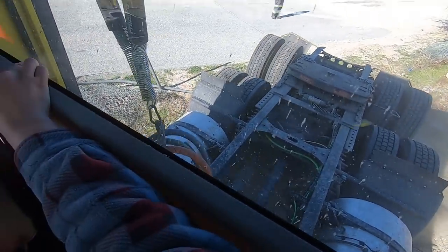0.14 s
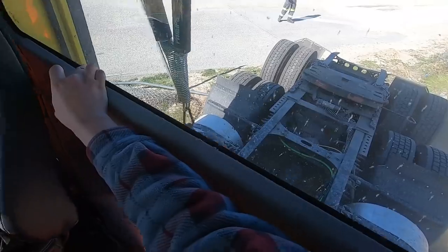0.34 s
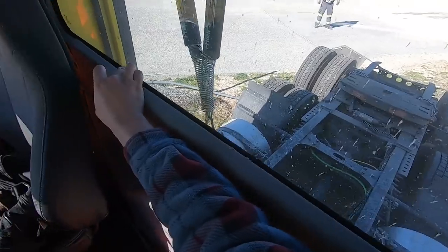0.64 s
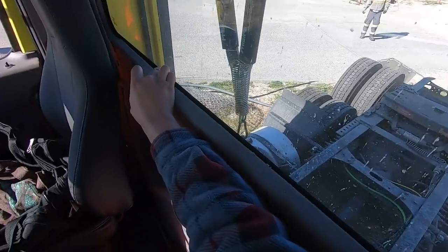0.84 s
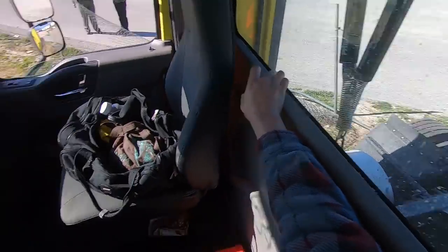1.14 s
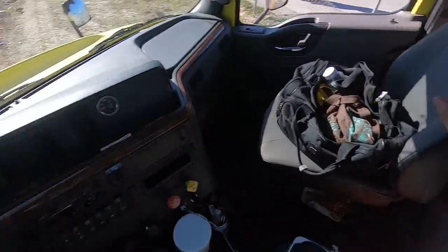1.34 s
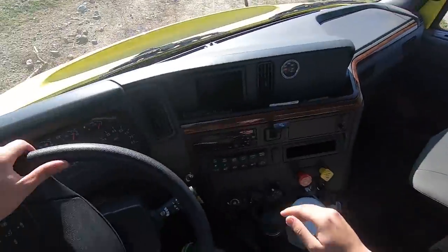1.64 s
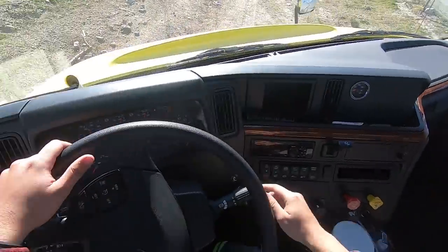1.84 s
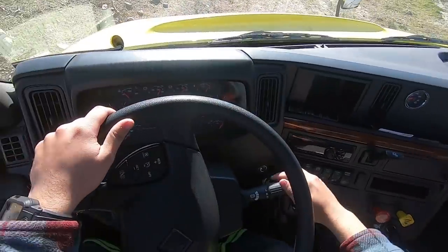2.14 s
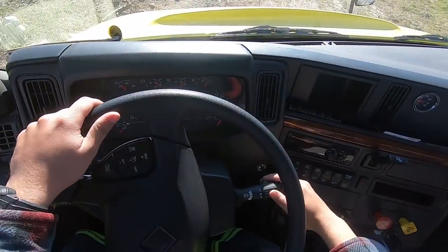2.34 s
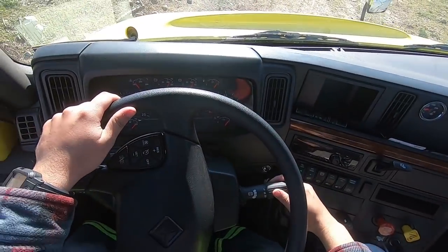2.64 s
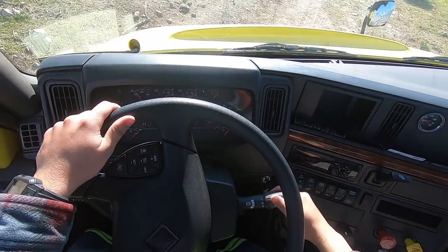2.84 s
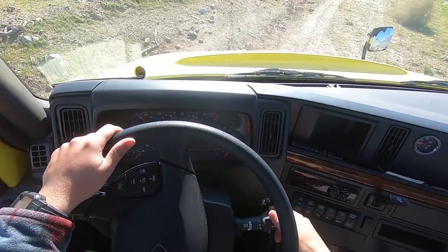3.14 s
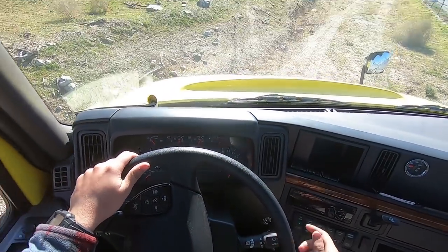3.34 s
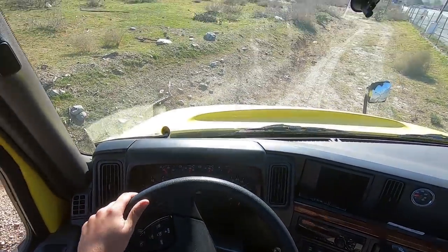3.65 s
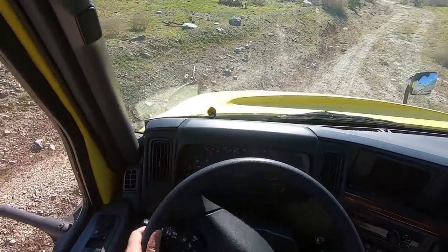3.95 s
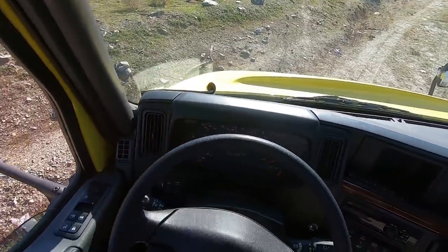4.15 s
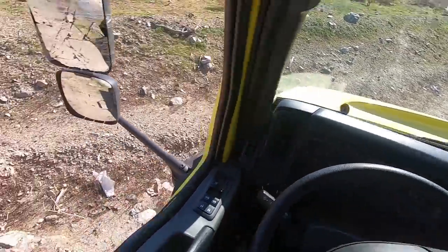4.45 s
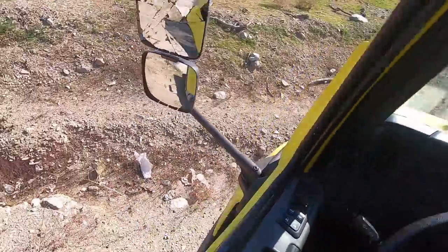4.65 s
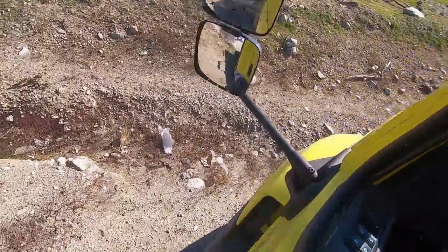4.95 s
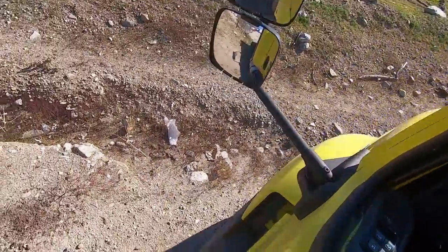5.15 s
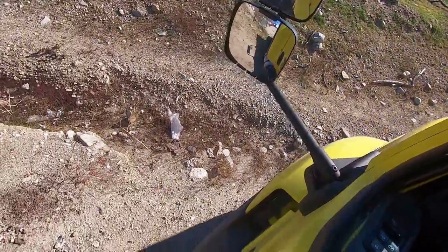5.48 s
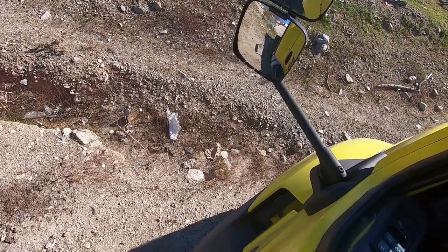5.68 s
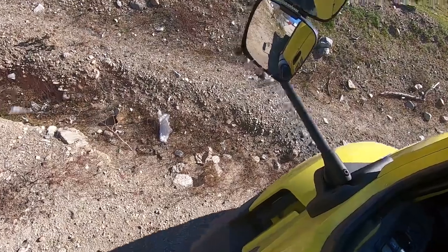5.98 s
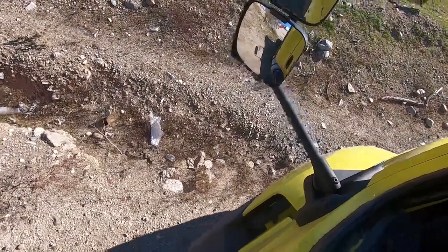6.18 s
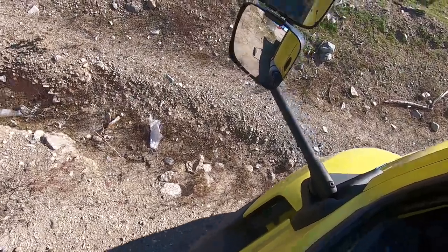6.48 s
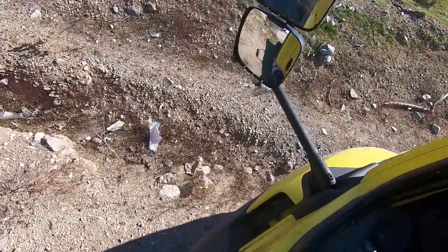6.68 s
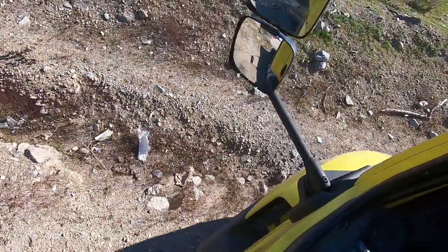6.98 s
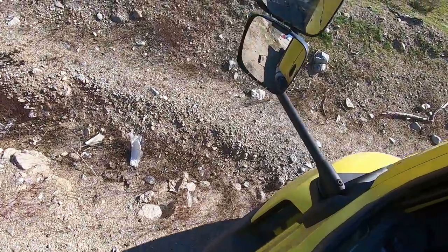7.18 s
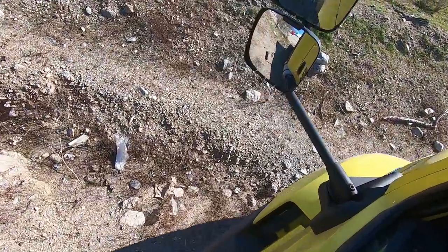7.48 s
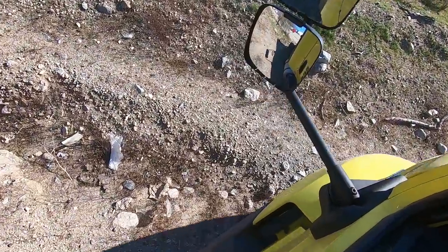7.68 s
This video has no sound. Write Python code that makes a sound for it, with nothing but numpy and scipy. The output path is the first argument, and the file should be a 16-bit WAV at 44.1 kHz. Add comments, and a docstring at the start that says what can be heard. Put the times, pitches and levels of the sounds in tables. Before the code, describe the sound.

A diesel truck engine booms and slows to idle inside the cab, then clatters through an open window as air brakes hiss.

```python
"""A six-cylinder diesel truck booms and clatters as it drops from a fast idle to a slow one, heard close,
from the driver's seat. The cab's air resonates near the firing rate, panels thump, a lever clicks and
air valves hiss. From 4.7 s the microphone hears the engine through the open side window: a hollow roar
rises under the bonnet, the brakes vent, the brake valve's rubber diaphragm honks in the escaping air
and wind buffets the microphone."""
import sys
import numpy as np
from scipy import signal
from scipy.fft import rfft, irfft
from scipy.io import wavfile
from scipy.ndimage import uniform_filter1d, map_coordinates

SR = 44100
rng = np.random.default_rng(int(sys.argv[2]) if len(sys.argv) > 2 else 0)


def master_out(mix):
    """Clip the mix to full scale and print it as 16-bit PCM to the path in sys.argv[1]."""
    frames = np.transpose(np.atleast_2d(mix))
    ceiling = np.clip(frames, -1, 1)
    pcm = np.round(ceiling * 32767).astype(np.int16)
    wavfile.write(sys.argv[1], SR, pcm)


N = 344862
T = np.arange(N) / SR
WINDOW_S = 4.7  # the microphone goes from the cab to the open window


def engine():
    """Firings boom in the cab, sing in the exhaust and pulse the noise of block and valve gear."""
    # engine speed: time_s, firing_hz
    revs = [(0, 49.03), (.4, 45.95), (1.2, 41.56), (1.75, 34.37), (2.3, 33.03), (2.6, 30.68), (3, 30.27),
            (7.82, 30.3)]
    # the engine at the side window: time_s, boom_db, overtones_db, drone_db, clatter_db
    at_window = [(4.76, -26.5, -28, -37.5, -46), (5.2, -27.5, -28.5, -41.5, -42.5),
                 (5.7, -29.5, -28, -45, -40), (6.05, -22, -29, -42.5, -36), (6.4, -24, -22.5, -34, -36.5),
                 (7.1, -24, -26, -38.5, -39), (7.82, -28, -22, -36, -33.5)]
    idle_hz = 30.4
    firing_hz, = curve(revs)
    octaves = np.log2(firing_hz / idle_hz)
    firings = np.cumsum(firing_hz * (1 + .003 * walk(6))) / SR
    inside = uniform_filter1d(1. * (T < WINDOW_S + .03), size=2600)
    facing_rear = 1 - ramp(1.06, .45)  # the driver faces the open rear window, then turns away
    lean_db = -1.5 * ramp(3.404, .27)  # the noise drops as the driver leans back
    load_db = 4 * np.exp(-T / .2)  # the overtones soften as the load comes off
    in_cab = (cab_resonance_db(firing_hz),
              -28.5 + 5 * octaves + 4.5 * facing_rear + load_db,
              -41.5 + 17.5 * octaves + .23 * lean_db,
              -50 + 9.5 * octaves + lean_db + .5 * facing_rear)
    boom_db, overtones_db, drone_db, clatter_db = (
        inside * cab + (1 - inside) * window for cab, window in zip(in_cab, curve(at_window)))
    tones = boom(firings, inside) * undb(boom_db)
    tones += exhaust(firing_hz, firings, octaves, inside) * undb(overtones_db)
    puffs = firing_puffs(firings)
    return (tones + rumble(inside) + drone(puffs) * undb(drone_db)
            + clatter(puffs, inside) * undb(clatter_db))


def cab_resonance_db(firing_hz, cab_hz=32.04, width_hz=10.8):
    """The boom grows as the firing rate nears the resonance of the cab's air."""
    detuning_db = 10 * np.log10(1 + (2 * (firing_hz - cab_hz) / width_hz) ** 2)
    position_db = -3.5 * np.minimum(np.abs(T - 3.83), 1.3)  # fullest with the head over the wheel
    surge_db = 5.5 * np.exp(-((T - 2.007) / .088) ** 2)  # one surge as the revs settle
    return -11.5 - detuning_db + position_db + surge_db


def boom(firings, inside):
    """One pressure wave per firing, steadiest while the cab resonates."""
    shake_db = np.interp(T, [2.2, 2.7, WINDOW_S, WINDOW_S + .11], [1.9, .8, .8, 3.2])
    return -np.sqrt(2) * np.cos(2 * np.pi * (firings + inside / 4)) * undb(shake_db * walk(18))


def exhaust(firing_hz, firings, octaves, inside, firings_per_turn=3):
    """Overtones of the crankshaft; multiples of the firing rate line up into one sharp pulse."""
    # exhaust tones: crankshaft_multiple, level_db
    overtones = [(2, -3.5), (4, -10), (5, -11.5), (6, -7.5), (7, -3.5), (8, -5.5), (9, -1.5), (10, -8.5),
                 (12, -7), (13.5, -10.5), (14, -11), (16, -6), (20, -18.5), (24, -22.5)]
    # cab modes that lift or dip a tone crossing them: centre_hz, width_hz, gain_db
    cab_modes = [(119.8, 6.3, -1), (146.8, 12, 2.5)]
    uneven_db = -4 + 5 * octaves  # tones between the firing multiples fade as the engine slows
    out = 0
    for multiple, db in overtones:
        between = multiple % firings_per_turn > 0
        hz = multiple * firing_hz / firings_per_turn
        mode_db = sum(gain * np.exp(-((hz - centre) / width) ** 2) for centre, width, gain in cab_modes)
        waver_db = 2.55 * walk(4.6) + 2.25 * walk(18)
        cycles = multiple * firings / firings_per_turn + rng.random() * between
        out -= undb(db + inside * mode_db + waver_db + uneven_db * between) * np.cos(2 * np.pi * cycles)
    return out


def firing_puffs(firings, spread_db=4.7):
    """A decaying puff of pressure at each firing, no two alike."""
    strength = undb(spread_db * rng.standard_normal(int(firings[-1]) + 400))[firings.astype(int)]
    return uniform_filter1d(strength * np.exp(-(firings % 1) / .21), size=150)


def rumble(inside):
    """Low churning noise of engine and wind."""
    # rumble spectrum in the cab: frequency_hz, level_db
    cab = [(15, -9), (30, 5.5), (75, -4.5), (140, -2), (210, -18.5), (330, -17.5), (500, -58)]
    # rumble spectrum at the window: frequency_hz, level_db
    window = [(12, -19.5), (35, -2), (90, -4.5), (170, -9.5), (400, -28), (550, -52)]
    # strength of rumble and wind: time_s, level_db
    wind = [(0, -26), (.5, -19.5), (1.1, -21), (2.2, -25.5), (3.5, -28), (4.5, -27), (4.9, -25), (5.2, -23),
            (5.8, -37), (6.4, -26), (7.1, -35), (7.82, -31.5)]
    churn = rng.standard_normal(N) * undb(2 * walk(14))
    return (inside * colour(churn, cab) + (1 - inside) * colour(churn, window)) * undb(curve(wind)[0])


def drone(puffs):
    """The block drones with low noise that swells at each firing."""
    # drone spectrum: frequency_hz, level_db
    spectrum = [(110, -11), (180, 0), (247, -8), (312, -5.5), (447, -6.5), (658, -9), (829, -14),
                (1400, -26), (1820, -59.5)]
    shaking = rng.standard_normal(N) * (1 + .45 * puffs) * undb(.9 * walk(16))
    return colour(ripple(shaking), spectrum)


def clatter(puffs, inside):
    """The valve gear rattles brightly in step with the firings."""
    # clatter spectrum in the cab: frequency_hz, level_db
    cab = [(600, -22), (1150, -2.5), (2400, -13), (4600, -23), (6100, -26.5), (9000, -37), (12500, -57)]
    # clatter spectrum at the window: frequency_hz, level_db
    window = [(600, -6.5), (900, -2.5), (1600, -5), (1900, -10), (4000, -20.5), (4500, -21.5), (5100, -27),
              (7900, -34), (8300, -35.5), (12500, -61)]
    ticks = ripple(rng.standard_normal(N) * (1 + .26 * puffs) * undb(.6 * walk(12)))
    return inside * colour(ticks, cab) + (1 - inside) * colour(ticks, window)


def ripple(x, spread_db=2.2, width_hz=25):
    """A fine random ripple in the spectrum, changing about every second, makes the noise ring faintly."""
    hz, times, spectra = signal.stft(x, SR, nperseg=4096)
    lift = rng.standard_normal((int(hz[-1] / width_hz) + 2, int(times[-1]) + 2))
    grid = np.meshgrid(hz / width_hz, times, indexing="ij")
    lift = map_coordinates(lift, grid, order=3, mode="nearest")
    return signal.istft(spectra * undb(spread_db * lift), SR, nperseg=4096)[1][:N]


def knocks():
    """Each blow is a soft contact that rings the panels with its own mix of modes, over a dull thud."""
    # blows on the cab: start_s, level_db, tilt_db_per_octave
    blows = [(.447, -21, 0), (.505, -17, 6), (.517, -9, -5), (.543, -16, -3.5), (1.324, -23.5, -1.5),
             (1.61, -26, -5), (1.96, -26, -3.5), (2.53, -22, -11), (2.577, -21.5, -5), (2.81, -36, -17),
             (3.32, -24.5, -10), (3.54, -29.5, -7)]
    # panel modes: pitch_hz, level_db, t60_s
    panels = [(146.2, -8.5, 0.32), (200, 5, 0.073), (262.6, -1, 0.31), (286, 2.5, 0.33), (325, -6, 0.25),
              (413, -3.5, 0.33), (528, -4.5, 0.065), (644, -2, 0.064), (740, 1.5, 0.069), (854, -2, 0.06),
              (990, -3.5, 0.042), (1230, -20.5, 0.027)]
    out, t = np.zeros(N), T[:SR // 3]
    soft = signal.butter(4, 1200, fs=SR, output="sos")
    for start_s, db, tilt_db in blows:
        scatter_db = 2 * rng.standard_normal(len(panels))
        detunes = 1 + .008 * rng.standard_normal(len(panels))
        ring = sum(undb(mode_db + tilt_db * np.log2(hz / 300) + chance_db - 60 * t / t60)
                   * np.sin(2 * np.pi * hz * detune * t)
                   for (hz, mode_db, t60), chance_db, detune in zip(panels, scatter_db, detunes))
        dull = signal.butter(1, [120, 900 * undb(tilt_db)], "band", fs=SR, output="sos")
        thud = .51 * unit(signal.sosfilt(dull, rng.standard_normal(len(t)))) * np.exp(-t / .021)
        blow = (ring / ring[:SR // 40].std() + thud) * (1 - np.exp(-t / .0021))
        start = int(start_s * SR)
        out[start:start + len(t)] += undb(db) * signal.sosfilt(soft, blow)
    return out


def honks(fade_s=.03):
    """The brake valve's rubber diaphragm flutters in the dying air stream."""
    # flutters: peak_s, pitch_hz, glide_hz_per_s, first_partial_db, second_db, third_db, rise_s
    flutters = [(6.407, 608, -450, -18.5, -16.5, -44, 0.036), (6.45, 570.4, -100, -14.5, -22, -27, 0.022),
                (6.483, 605, -700, -20, -28, -40.5, 0.028), (6.741, 588, -100, -30, -47, -40.5, 0.03),
                (6.796, 602.5, 102, -25.5, -30.5, -41, 0.05), (7.825, 623, -500, -20, -23, -48, 0.019)]
    out, waver = 0, 1 + .012 * walk(110) + .005 * walk(35)
    for peak_s, pitch_hz, glide, first_db, second_db, third_db, rise_s in flutters:
        hz = (pitch_hz + glide * np.clip(T - peak_s, -.1, .1)) * waver
        gain = uniform_filter1d(swell(peak_s, rise_s, fade_s), size=300)
        upper = sine(3 * hz) + .2 * sine(4 * hz) + .2 * sine(5 * hz)
        overtones = undb(second_db) * sine(2 * hz) + undb(third_db) * upper
        out += gain * (undb(first_db) * sine(hz) + gain * overtones)  # brightest at the peak
    return out * undb(2.2 * walk(140) + .8 * walk(45))


def air_valves():
    """Escaping air hisses thinly in the cab; outside, the brakes vent with a fuller rush."""
    # valve releases: start_s, level_db, rise_s, hold_s, t60_s
    releases = [(1.17, -51, 0.02, 0.034, 0.2), (1.664, -58, 0.029, 0.26, 0.36),
                (3.317, -55, 0.025, 0.041, 0.48), (2.535, -64, 0.019, 0.026, 0.18),
                (4.004, -51.5, 0.034, 0.097, 0.84), (6.207, -32.5, 0.062, 0.11, 0.47),
                (7.7, -35, 0.045, 0.036, 0.93)]
    # hiss spectrum in the cab: frequency_hz, level_db
    cab = [(1800, -10.5), (4200, -4.5), (6500, -10), (7900, -10.5), (11500, -22.5), (14000, -46.5)]
    # spectrum of the venting brakes: frequency_hz, level_db
    brakes = [(800, -17), (1500, -3), (3040, -0.5), (5120, -5), (10300, -14.5), (11600, -33), (14500, -33)]
    gain = sum(ramp(s, rise) ** 2 * undb(db - 60 * np.maximum(T - s - rise - hold, 0) / t60)
               for s, db, rise, hold, t60 in releases)
    jet = rng.standard_normal(N) * undb(1.2 * walk(30))
    return gain * np.where(T < WINDOW_S, colour(jet, cab), colour(jet, brakes) * undb(1.26 * walk(120)))


def clicks(rise_s=.0063, t60_s=.094):
    """Lever and trim click in short bright bursts that fade quickly; small metal parts ping."""
    # clicks of lever and trim: start_s, level_db
    bursts = [(.508, -46.5), (1.9745, -49), (2.9189, -33), (2.969, -32), (3.305, -48.5)]
    # metallic pings: peak_s, pitch_hz, level_db
    pings = [(.508, 8900, -61), (0.96, 6900, -53), (6.85, 5900, -52), (2.7, 1090, -34)]
    gain = sum(undb(db - 60 * np.abs(T - s) / t60_s) * ramp(s, rise_s) for s, db in bursts)
    metal = sum(undb(db) * swell(s, .001, .012) * np.sin(2 * np.pi * hz * T) for s, hz, db in pings)
    spectrum = [(800, -6), (2200, -6.5), (3500, -3), (8000, -11.5), (11000, -30), (14000, -41)]
    return metal + gain * colour(rng.standard_normal(N), spectrum)


def gusts():
    """Eddies hit the microphone as low thuds some 40 ms long."""
    # eddies at the window: peak_s, level_db
    eddies = [(5.139, -25.5), (5.258, -29), (5.472, -24.5), (5.594, -23.5), (6.259, -21), (6.419, -22),
              (6.488, -26), (6.708, -17), (6.779, -22), (6.867, -18.5), (7.197, -20.5)]
    gain = sum(undb(db) * np.exp(-((T - s) / .023) ** 2) for s, db in eddies)
    spectrum = [(20, -3.5), (70, -3.5), (150, -7.5), (300, -19), (700, -33)]
    return gain * colour(rng.standard_normal(N), spectrum)


def bonnet_roar():
    """A hollow band of noise from under the bonnet, heard outside."""
    # course of the roar: time_s, centre_hz, level_db
    roar = [(4.7, 718.7, -64), (5.7, 720, -47.5), (6.05, 664.6, -35.5), (6.6, 646.6, -35), (7.2, 624, -43),
            (7.82, 644, -44)]
    hz, db = curve(roar)
    return band(hz, 300) * undb(db)


def gear_whine(pitch_hz=726.5, peak_s=1.41, lever_s=2.96):
    """A wavering gear tone swells in the cab, then settles in once the lever has clicked over."""
    steady = uniform_filter1d((.5 * (T > peak_s) + .5 * (T > lever_s)) * (T < WINDOW_S), size=4000)
    gain = undb(-42) * swell(peak_s, rise_s=.073, fade_s=.25) + undb(-53) * steady
    tone = sine(pitch_hz * (1 + .003 * walk(8))) * undb(3 * walk(10))
    return gain * (tone + .8 * band(1.02 * pitch_hz, 30))


def fan(start_hz=530, sag_hz_per_s=290, length_s=.79):
    """The fan's tone swells and fades as it falls in pitch."""
    run = ramp(.72, length_s)
    return band(start_hz - sag_hz_per_s * length_s * run, 16) * np.sin(np.pi * run) * undb(-38)


def rasp():
    """A rasp that dies as the load comes off."""
    return band(2490, 450) * undb(-47.5) * np.exp(-T / .13)


def panel_hum(pitch_hz=256.6):
    """A panel hums with its octave while the revs pass."""
    gain = undb(-37.5) * np.sin(np.pi * ramp(1.453, .73))
    return gain * (band(pitch_hz, 15) + undb(-8) * band(2 * pitch_hz, 13))


def outside_tone_and_hiss():
    """A thin tone and a narrow band of hiss fade in at the window."""
    return ramp(WINDOW_S, .83) * (band(326, 6) * undb(-51.5) + band(4600, 500) * undb(-66))


def undb(db):
    return 10 ** (np.asarray(db) / 20)


def unit(x):
    return x / np.sqrt(np.mean(x ** 2))


def curve(rows):
    """Columns of a timed table at every sample, holding the end values."""
    times, *columns = np.transpose(rows)
    return [np.interp(T, times, column) for column in columns]


def ramp(start_s, length_s):
    """Climbs from 0 to 1 and stays there."""
    return np.clip((T - start_s) / length_s, 0, 1)


def swell(peak_s, rise_s, fade_s):
    """Grows to 1 at the peak and dies away after it."""
    return np.exp(np.where(T < peak_s, (T - peak_s) / rise_s, (peak_s - T) / fade_s))


def colour(x, spectrum):
    """Shapes x by (frequency_hz, level_db) points; rms 1."""
    hz, db = np.transpose(spectrum)
    bins_hz = np.maximum(np.arange(N // 2 + 1) * SR / N, 1)
    return unit(irfft(rfft(x) * undb(np.interp(np.log(bins_hz), np.log(hz), db, -90, -90)), N))


def walk(rate_hz):
    """Random levels held 1 / rate_hz seconds and smoothed twice; rms 1."""
    hold = int(SR / rate_hz)
    steps = np.repeat(rng.standard_normal(N // hold + 1), hold)
    return unit(uniform_filter1d(uniform_filter1d(steps, hold), hold)[:N])


def sine(hz):
    return np.sqrt(2) * np.sin(2 * np.pi * np.cumsum(hz) / SR)


def band(hz, width_hz):
    """Noise of about this width, carried up to a fixed or moving centre."""
    phase = 2 * np.pi * np.cumsum(np.broadcast_to(hz, N)) / SR
    return sum(walk(width_hz) * np.cos(phase + shift) for shift in (0, np.pi / 2))


def scene():
    """All sources meet at one microphone."""
    running = engine() + gear_whine() + fan() + rasp() + panel_hum() + outside_tone_and_hiss()
    return (running + bonnet_roar() + knocks() + clicks() + air_valves() + honks() + gusts())[None]


def record(dry, top_hz=14500):
    """The sound fades over 3 ms at each end; the loudest peaks are rounded and the top is cut."""
    faded = dry * np.minimum(np.minimum(T, T[-1] - T) / .003, 1)
    rounded = np.tanh(1.09 * faded) / 1.106
    return signal.sosfilt(signal.ellip(8, .2, 70, top_hz, fs=SR, output="sos"), rounded)


dry = scene()
out = record(dry)
master_out(out)
```